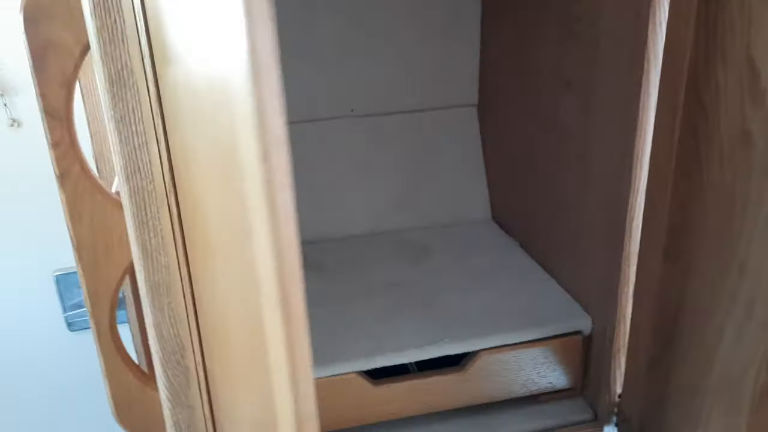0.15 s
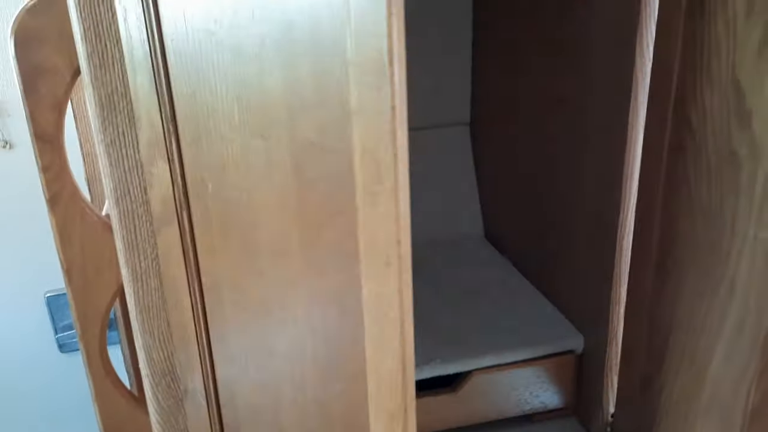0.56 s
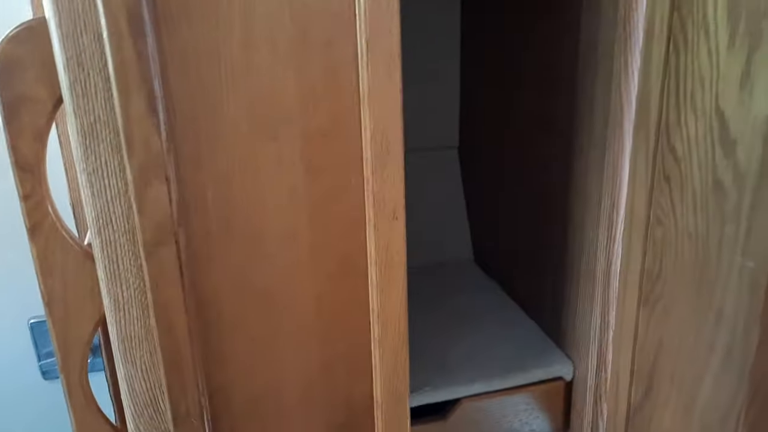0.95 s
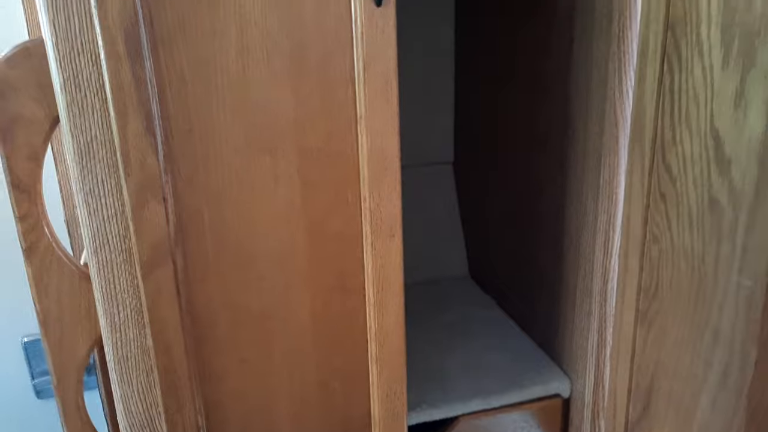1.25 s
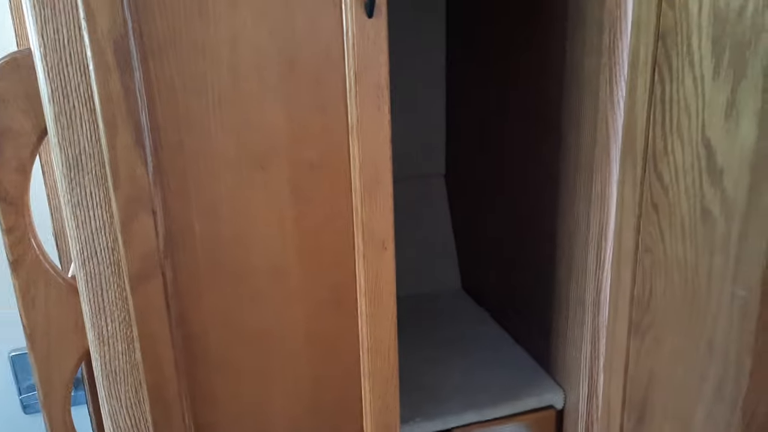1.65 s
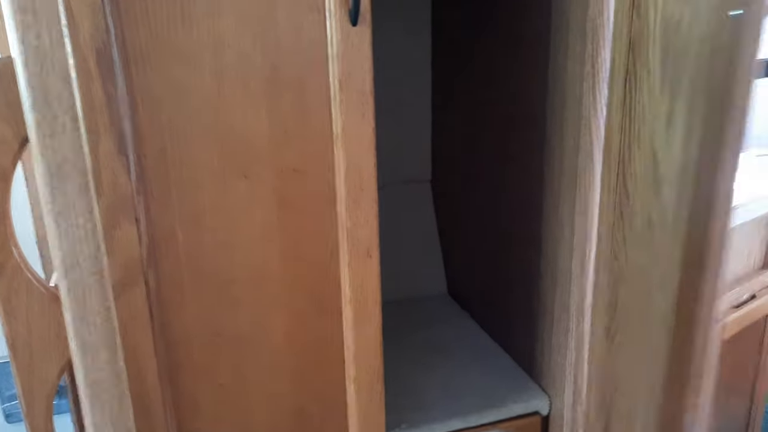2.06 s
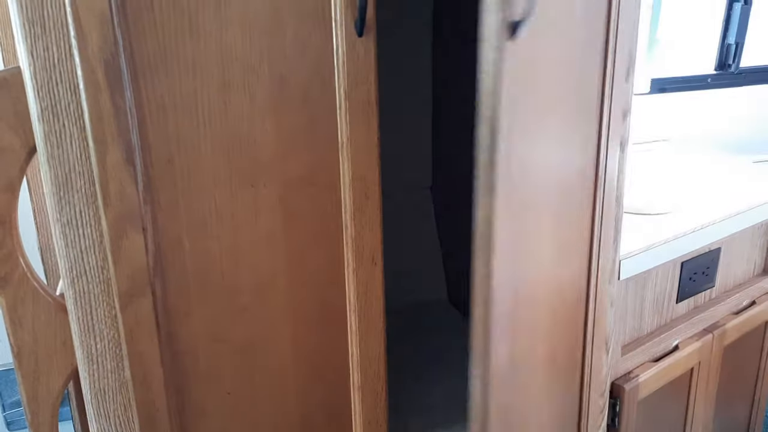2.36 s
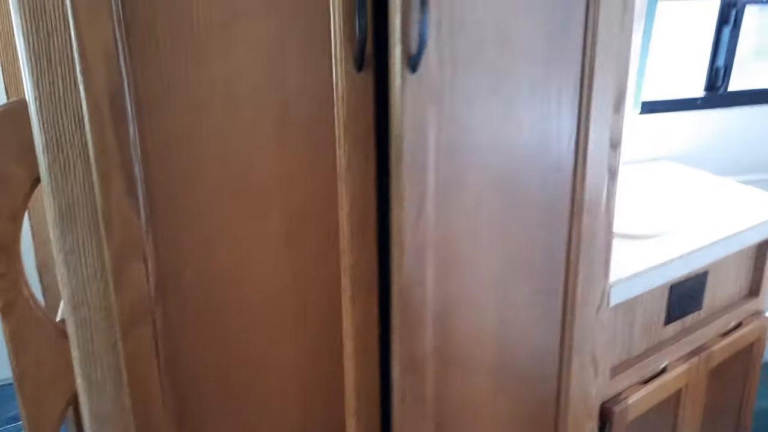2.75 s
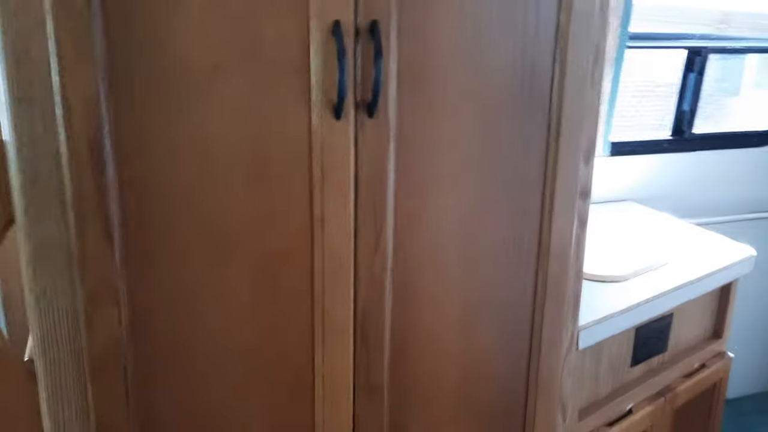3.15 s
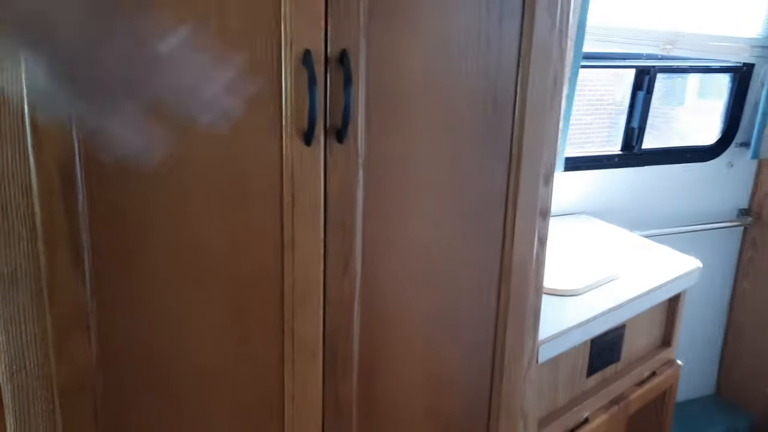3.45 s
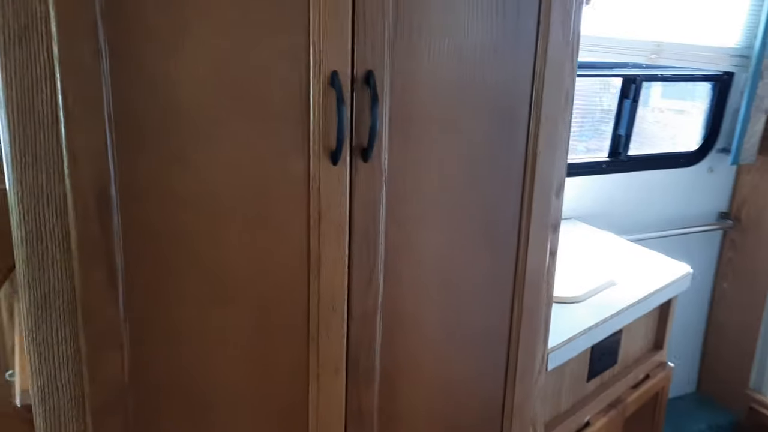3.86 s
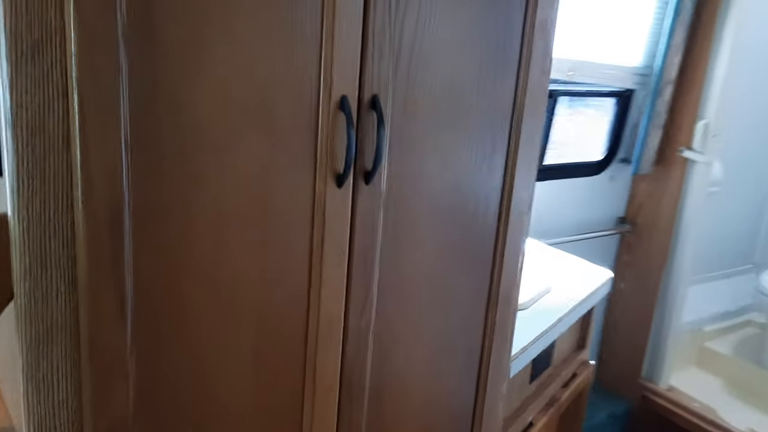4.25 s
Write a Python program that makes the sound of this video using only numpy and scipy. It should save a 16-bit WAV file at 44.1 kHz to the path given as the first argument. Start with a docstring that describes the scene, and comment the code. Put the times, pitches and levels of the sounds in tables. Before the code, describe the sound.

Two wooden closet doors bang shut about two seconds apart in a small camper, each with a clattering rebound and hollow ring.

```python
"""Two wooden closet doors swing shut, one after the other, in the small cabin of a camper.
Each strikes its spring catch, slams on the frame and chatters to rest: decaying modes ring panel, frame
and hollow closet, and shaped noise makes the wood clatter, the crack and the jingle of the catch.
The left door drones on its hinges; a sleeve swishes in grainy noise with each push.
Beneath lie a low rumble that swells and sinks and a thin, even hiss."""
import sys
import numpy as np
from scipy import signal
from scipy.fft import rfft, irfft
from scipy.io import wavfile
from scipy.ndimage import uniform_filter1d

SR = 44100
rng = np.random.default_rng(int(sys.argv[2]) if len(sys.argv) > 2 else 0)


def master_out(mix):
    """Clip the mix to full scale and print it as 16-bit PCM to the path in sys.argv[1]."""
    frames = np.transpose(np.atleast_2d(mix))
    ceiling = np.clip(frames, -1, 1)
    pcm = np.round(ceiling * 32767).astype(np.int16)
    wavfile.write(sys.argv[1], SR, pcm)


N = 194511  # length in samples
TIME = np.arange(N) / SR  # s
AGE = np.arange(SR) / SR  # s since a contact

# a door meets its frame and rebounds:
# [t/s, door (0 left, 1 right), force level/dB, panel ring level/dB, crack level/dB]
KNOCKS = [(0.9182, 0, -10, -19, -12), (.9735, 0, -18, -22, -12), (1.0216, 0, -22, -27.5, -16.5),
          (1.0651, 0, -19.5, -21, -17.5), (1.106, 0, -28.5, -51, -27), (2.9775, 1, -13, -15, -12),
          (2.9894, 1, -15, -18.5, -20.5), (3.0478, 1, -22.5, -32.5, -44), (3.104, 1, -32.5, -32, -48),
          (3.154, 1, -37, -46, -55)]
# the spring catch is struck or slips:
# [t/s, door (0 left, 1 right), force level/dB, panel ring level/dB, crack level/dB, jingle level/dB]
CATCH_HITS = [(0.8998, 0, -23, -27, -29.5, -29), (1.4333, 0, -71, -77, -42, -52.5),
              (2.87, 1, -30.5, -32, -35, -29.5)]
# how each door (left, right) answers a force:
# [boom level/dB, wood clatter level/dB, shudder level/dB, ring length as a factor]
DOOR_RESPONSE = [(-2.5, -1, -12, 1.0), (1.5, 0, -8, 0.74)]
# extra damping once a door (left, right) is seated against its frame: [t/s, t60/s]
SEATED = [(1.125, 0.54), (3.19, 0.4)]
# ringing of each door panel: [f/Hz, level/dB, t60/s]
LEFT_PANEL = [(233.5, -5.5, .3), (319, 3, 0.4), (344.5, -9, 1), (488.5, -9, 0.41), (560, -13.5, 0.06),
              (741, -10.5, 0.1), (692, -14, .22), (961, -13.5, .3), (1182, -14.5, 0.28), (1262, -17.5, .28),
              (981, -15.5, 0.28)]
RIGHT_PANEL = [(252, -18.5, 0.15), (295.56, 6, 0.52), (323.5, -1, 0.23), (498.4, -6, 0.26),
               (593, -22, 0.087), (698, -9.5, 0.26), (759, -6.5, 0.17), (958, -11, 0.26),
               (1163, -20.5, 0.33), (1315, -14, 0.22), (848, -17.5, 0.25)]
# air and carcass of the closet behind each door: [f/Hz, level/dB, t60/s]
LEFT_CLOSET = [(60.7, -18, 0.34), (92.2, -11, 0.65), (113.5, -3, 0.47), (141.5, 1, 0.29), (165, -0.5, 0.13),
               (196.6, -6, .2)]
RIGHT_CLOSET = [(58, -7, 0.55), (89.26, -6.5, 0.5), (125, -2, .4), (141, -3.5, 0.14), (185.1, -11, 0.51)]
# sharp, short modes of each door's hardwood frame: [f/Hz, level/dB]
LEFT_FRAME = [(1475, 4.5), (2200, 4.5), (2491, 2.5), (3600, -5.5), (3724, -7), (3949, -6), (4020, -9.5),
              (4358, 3.5), (4998, -4.5), (5224, -8), (6052, -3), (6184, -5)]
RIGHT_FRAME = [(1451, -1.5), (1908, -1), (2291, 0), (2548, -1.5), (2622, -4), (2910, -5.5), (2970, -7.5),
               (3203, -8), (3400, -10), (3938, -9), (5090, -7), (5905, -7)]
# dense modes of wood and cabin: [f/Hz, level/dB per Hz]
WOOD = [(40, -27), (120, -3.5), (200, 2), (310, 2.5), (400, 0), (720, -1.5), (1000, -2.5), (1400, -8.5),
        (2000, -8.5), (3000, -9.5), (4500, -16), (6300, -15.5), (7500, -23.5), (10000, -34), (16000, -31)]
# their decay, before the door's length factor and the early loss: [f/Hz, t60/s]
WOOD_T60 = [(100, 1), (300, 1), (700, 0.59), (1400, 0.47), (3000, 0.24), (6000, 0.27), (14000, 0.51)]
# bright first crack of a contact: [f/Hz, level/dB per Hz]
CRACK = [(200, -21), (700, 1), (1500, -11), (2900, 2), (4500, -3), (6300, -3), (7800, -13.5), (10000, -27),
         (16000, -23.5)]
# jingle of the small steel catch: [f/Hz, level/dB per Hz]
CATCH = [(500, -34), (2000, -6.5), (4000, 1), (6500, -1.5), (9500, -8), (12000, -2), (15000, -0.5),
         (16500, -11.5)]
# thunk of the catch block when struck: [f/Hz, level/dB, t60/s]
CATCH_BLOCK = [(76.2, -5, .7), (130, 0, 0.44), (250, -13, .3), (338, 10, 0.31), (814, -19, 0.17)]
# catch spring of the left door, singing on faintly after the slam: [f/Hz, level/dB, t60/s]
SPRING = [(1491, -54, .8), (1550, -60, 1.15), (2799, -43, .6), (2869, -47, .55)]
# drone of the left door rubbing on its hinges: [f/Hz, level/dB per Hz]
RUB = [(100, -22.5), (230, -9.5), (320, 2), (420, -10.5), (600, -24.5), (1500, -51.5), (5000, -70)]
# rustle of the sleeve: [f/Hz, level/dB per Hz]
SWISH = [(800, -17), (2000, 1.5), (4000, -2.5), (5500, 3.5), (8000, 5), (10000, 0.5), (13000, 4.5),
         (16000, -2.5)]
# the arm pushes each door and draws back: [t of fastest movement/s, spread/s, level/dB]
STROKES = [(.72, 0.37, -69.5), (1.26, 0.13, -63), (2.92, 0.11, -60), (3.21, 0.1, -54.5)]
# tone of the soft scuffs of movement: [f/Hz, level/dB per Hz]
SCUFF = [(30, -3), (120, 12.5), (300, 13.5), (900, 7.5), (1500, 1.5), (3000, 2), (6000, -1), (10000, -4),
         (16000, -7)]
# when they come: [t of the peak/s, spread/s, level/dB]
SCUFFS = [(0.656, 0.025, -62.5), (1.38, 0.027, -59), (3.482, 0.01, -65), (3.698, 0.034, -56.5),
          (4.035, 0.084, -58)]
# low rumble, in the background and in each shudder: [f/Hz, level/dB per Hz]
RUMBLE = [(12, -70.5), (20, -39.5), (34, -16.5), (43, -5), (118, 2.5), (187, -4.5), (236, -12), (291, -1),
          (654, -26), (809, -28.5), (890, -34), (1240, -36.5), (1390, -38.5), (2000, -46.5), (2600, -69.5),
          (4400, -120)]
# background rumble over time, calm between the doors: [t/s, level/dB]
RUMBLE_LEVEL = [(0, -55.5), (.5, -60), (1.2, -53), (1.85, -56.5), (2.3, -62.5), (2.85, -63), (3.72, -48),
                (4.0, -58.5), (4.41, -51.5)]
# left-right likeness of the sound: [f/Hz, coherence]
LIKENESS = [(100, .995), (250, 0.97), (500, 0.72), (1000, 0.35), (2000, 0.15), (4000, 0.03), (12000, 0)]
# left-right balance: [f/Hz, left minus right level/dB]
BALANCE = [(60, -3.5), (150, 4), (280, 0.38), (500, 2.5), (1000, -1), (2000, 1.6), (4000, 0.5),
           (8000, -0.5), (13000, 5.76)]

FULL_FORCE_DB = -13  # reference force of a full slam
BASS_SLOPE = .75  # dB of bass per dB of force
CRACK_T60, CATCH_T60 = 0.026, .11  # s; the catch also takes the door's length factor
SHAKE_DB, SHAKE_SLOPE = -29, 2.2  # jingle at full force, and its dB per dB of force
SHUDDER_RISE_S, SHUDDER_T60 = 0.058, 0.72  # s
CLATTER_TOP_HZ, DULLING_DB = 14600, 23.5  # treble edge at full force; dB of force that lower it tenfold
CABIN_SHARE, WOOD_EARLY_T60 = 0.25, .3  # share of clatter spared the early loss; t60 of that loss in s
FRAME_DB, FRAME_SLOPE = -30, 1.1  # level at full force, and dB per dB of force
FRAME_T60, FRAME_FALL = .16, .6  # t60 in s at 2 kHz, and the power by which it shortens with frequency
RUB_S, RUB_LENGTH_S, RUB_DB = .56, 0.28, -50
HISS_DB = -82
EDGE_HZ = 16300  # upper band limit


def from_db(db):
    """Turn dB into amplitude gain."""
    return 10 ** (np.asarray(db) / 20)


def read(points, hz):
    """Read a table's value on a log-frequency axis."""
    f, value = np.transpose(points)
    return np.interp(np.log(hz + 1), np.log(f + 1), value)


def level(curve):
    """Gain over time from rows of t/s, level/dB."""
    return from_db(np.interp(TIME, *np.transpose(curve)))


def dying(t60):
    """Exponential decay that falls 60 dB in t60 seconds."""
    return np.exp(-np.log(1000) * AGE / t60)


def rising(rise_s):
    """Exponential swell towards full level."""
    return 1 - np.exp(-AGE / rise_s)


def add(mix, s, sound):
    """Lay a sound into the mix at s seconds, cutting it at the end."""
    part = mix[:, round(s * SR):][:, :sound.shape[1]]
    part += sound[:, :part.shape[1]]


def sides(hz):
    """Left and right gains that share out the balance at each frequency."""
    return from_db(np.multiply.outer([.5, -.5], read(BALANCE, hz)))


def noise(spectrum, size):
    """Stereo noise of rms 1, alike on both sides in the bass and unrelated in the treble."""
    hz = np.fft.rfftfreq(size, 1 / SR)
    mid, side = np.exp(2j * np.pi * rng.random((2, len(hz))))
    same = np.clip(read(LIKENESS, hz), -1, 1)
    mid = mid * np.sqrt(1 + same)
    side = side * np.sqrt(1 - same)
    gain = sides(hz) * from_db(read(spectrum, hz)) * (hz > 15)
    x = irfft(np.array([mid + side, mid - side]) * gain, size)
    return x / x.std()


def doors():
    """Each door strikes its catch, slams, rebounds and seats; each knock shakes the catch by its force."""
    out = np.zeros((2, N))
    for s, door, force_db, panel_db, crack_db, jingle_db in CATCH_HITS:
        thunk = from_db(panel_db) * ring(CATCH_BLOCK, rise_s=.007, spread=0.93)
        add(out, s, thunk + contact(round(door), force_db, panel_db, crack_db, jingle_db))
    for s, door, force_db, panel_db, crack_db in KNOCKS:
        seated_s, t60 = SEATED[round(door)]
        since_seated = np.maximum(s + AGE - seated_s, 0)
        damping = np.exp(-np.log(1000) * since_seated / t60)
        jingle_db = SHAKE_DB + SHAKE_SLOPE * (force_db - FULL_FORCE_DB)
        add(out, s, damping * contact(round(door), force_db, panel_db, crack_db, jingle_db))
    add(out, KNOCKS[0][0], ring(SPRING, rise_s=.002, spread=0.76))
    return out


def contact(door, force_db, panel_db, crack_db, jingle_db):
    """One contact cracks, jingles the catch, rings frame and panel, pumps the closet and shudders the cabin."""
    if door:
        frame, panel, closet = RIGHT_FRAME, RIGHT_PANEL, RIGHT_CLOSET
    else:
        frame, panel, closet = LEFT_FRAME, LEFT_PANEL, LEFT_CLOSET
    boom_db, wood_db, shudder_db, length = DOOR_RESPONSE[door]
    over_db = force_db - FULL_FORCE_DB
    bass_db = FULL_FORCE_DB + BASS_SLOPE * over_db  # bass varies less than force

    boom = from_db(bass_db + boom_db) * ring(closet, rise_s=0.047, spread=.9)
    shudder = from_db(bass_db + shudder_db) * noise(RUMBLE, SR)
    shudder = shudder * rising(SHUDDER_RISE_S) * dying(SHUDDER_T60)
    panel_ring = from_db(panel_db) * ring(panel, rise_s=0.0025, spread=0.68)

    # softer contacts clatter with less treble
    top_hz = min(CLATTER_TOP_HZ * 10 ** (over_db / DULLING_DB), SR * .45)
    b, a = signal.butter(2, top_hz, fs=SR)
    wood = from_db(force_db + wood_db) * signal.lfilter(b, a, clatter(length))

    frame_modes = [(hz, db, FRAME_T60 * (hz / 2e3) ** -FRAME_FALL) for hz, db in frame]
    frame_ring = from_db(FRAME_DB + FRAME_SLOPE * over_db) * ring(frame_modes, rise_s=0.00036, spread=0.97)
    crack = from_db(crack_db) * noise(CRACK, SR) * dying(CRACK_T60)
    jingle = from_db(jingle_db) * noise(CATCH, SR) * dying(CATCH_T60 * length)
    return boom + shudder + panel_ring + wood + frame_ring + crack + jingle


def ring(modes, rise_s, spread):
    """Decaying modes that build up as the blow spreads; higher ones sound more out of step left to right."""
    out = np.zeros((2, SR))
    for k, (hz, db, t60) in enumerate(modes):
        apart = spread * np.arccos(np.clip(read(LIKENESS, hz), -1, 1))  # radians
        lag = np.array([[.5], [-.5]]) * apart * (-1) ** k
        tone = np.sin(2 * np.pi * hz * AGE + lag + k * np.pi)  # polarity alternates
        out += sides(hz)[:, None] * from_db(db) * dying(t60) * tone
    return out * rising(rise_s)


def clatter(length, build_cycles=0.61):
    """Crowded wood modes and cabin echoes: the treble builds fastest, the bass swells and lasts."""
    z, hz = rfft(noise(WOOD, SR)), np.fft.rfftfreq(SR, 1 / SR)
    centres, t60s = np.transpose(WOOD_T60)
    out = np.zeros((2, SR))
    # each row of the identity matrix opens one overlapping band
    for centre, t60, share in zip(centres, t60s, np.eye(len(centres))):
        band = irfft(z * read(np.c_[centres, share], hz), SR)
        out += band * dying(t60 * length) * rising(build_cycles / centre)
    return out * (CABIN_SHARE + (1 - CABIN_SHARE) * dying(WOOD_EARLY_T60))


def hinge():
    """Dry friction at the hinges makes the swinging left panel drone softly."""
    out, size = np.zeros((2, N)), round(RUB_LENGTH_S * SR)
    drone = noise(RUB, size) * signal.windows.tukey(size, .7)
    add(out, RUB_S, from_db(RUB_DB) * drone)
    return out


def clothing(grain_db=1.5):
    """A sleeve slides in tiny uneven slips, swelling with each arm stroke, with a few duller scuffs."""
    slips = uniform_filter1d(rng.standard_normal(N), size=200)
    grain = from_db(grain_db * slips / slips.std())
    cloth = noise(SWISH, N) * swells(STROKES) + noise(SCUFF, N) * swells(SCUFFS)
    return cloth * grain


def swells(rows):
    """Gain that rises to and falls from each peak, from rows of t/s, spread/s, level/dB."""
    return sum(from_db(db) * np.exp(-abs(TIME - s) / spread) for s, spread, db in rows)


def background():
    """Low noise rumble that swells and sinks, and a thin, even white hiss."""
    rumble = noise(RUMBLE, N) * level(RUMBLE_LEVEL)
    hiss = from_db(HISS_DB) * rng.standard_normal((2, N))
    return rumble + hiss


def scene():
    """Sum the doors, the hinge drone, the clothing and the background."""
    return doors() + hinge() + clothing() + background()


def record(dry):
    """Full-scale limit, then the band limit."""
    lowpass = signal.firwin(511, EDGE_HZ, window=("kaiser", 9), fs=SR)
    return signal.oaconvolve(np.clip(dry, -1, 1), lowpass[None], "same")


dry = scene()
out = record(dry)
master_out(out)
```